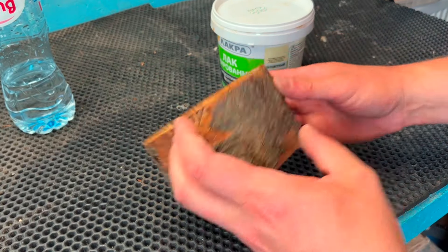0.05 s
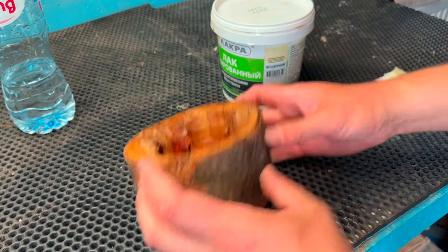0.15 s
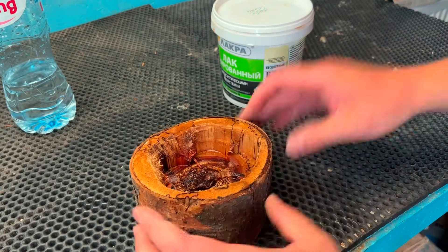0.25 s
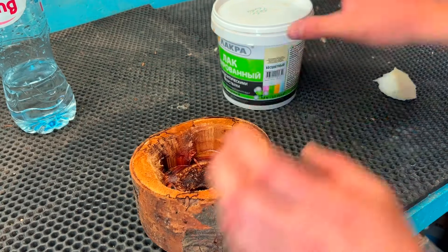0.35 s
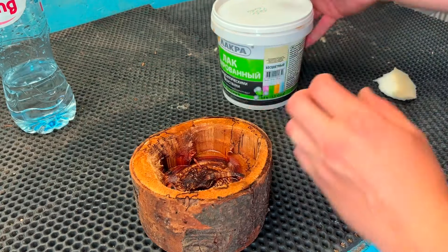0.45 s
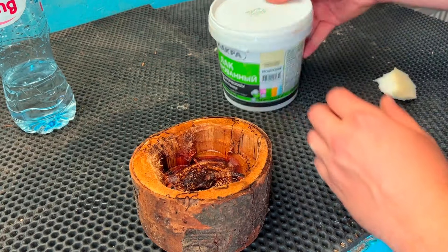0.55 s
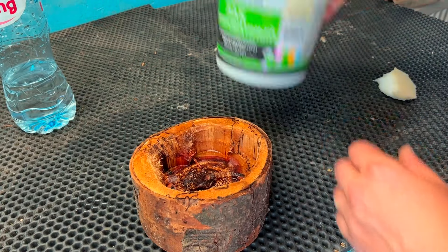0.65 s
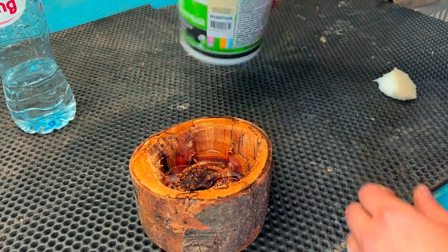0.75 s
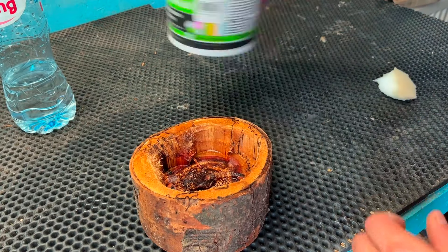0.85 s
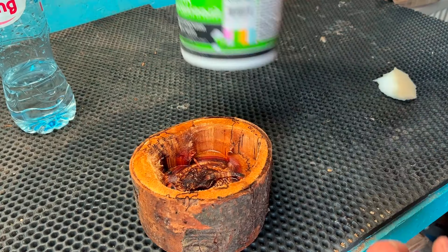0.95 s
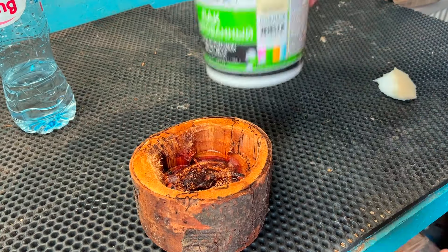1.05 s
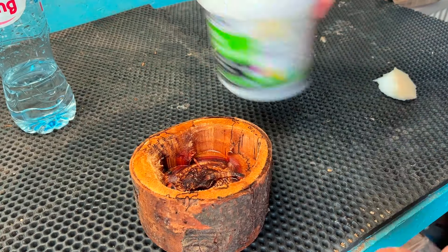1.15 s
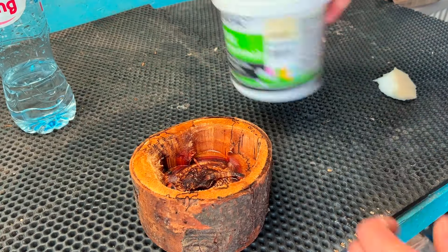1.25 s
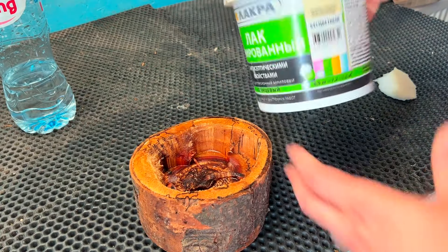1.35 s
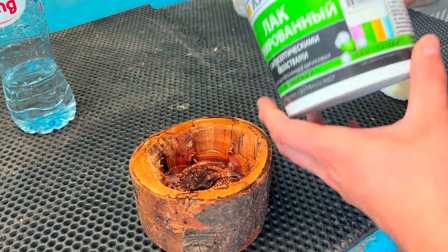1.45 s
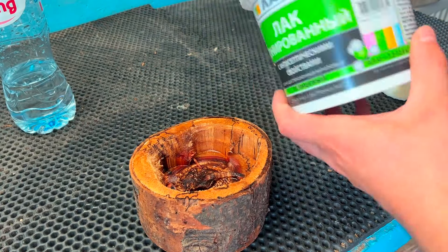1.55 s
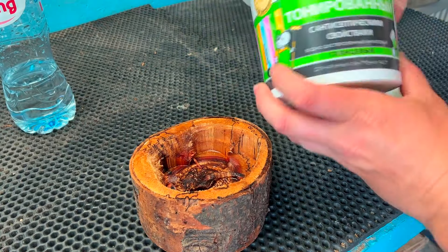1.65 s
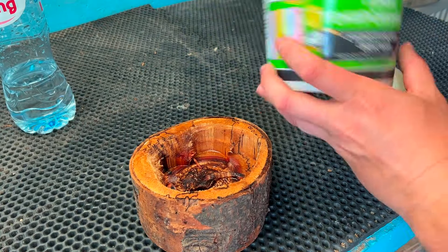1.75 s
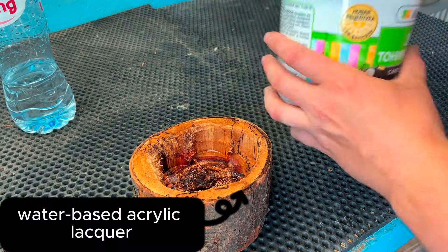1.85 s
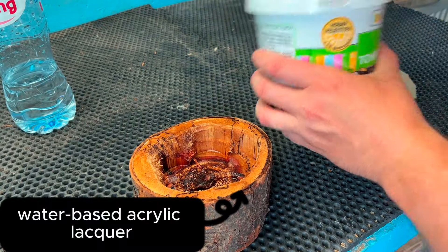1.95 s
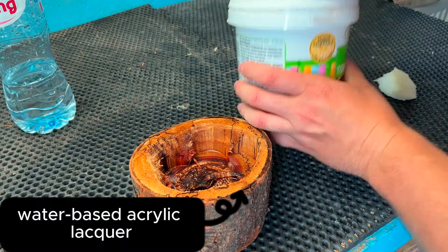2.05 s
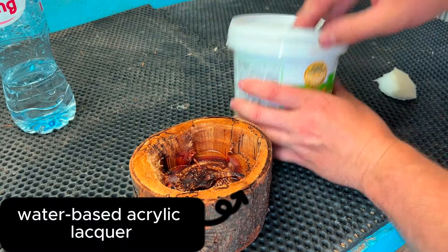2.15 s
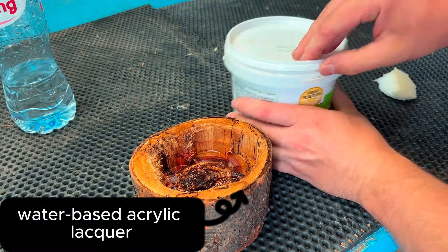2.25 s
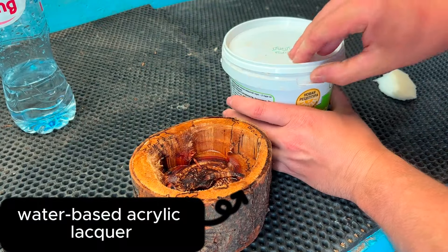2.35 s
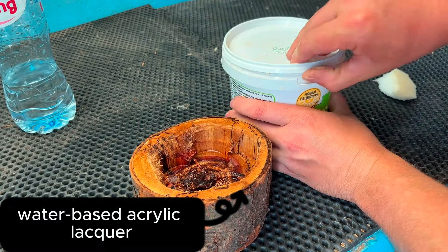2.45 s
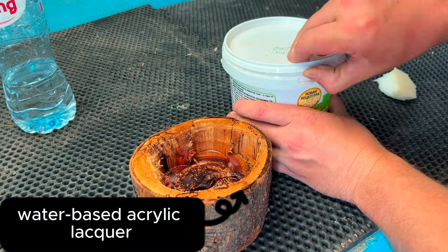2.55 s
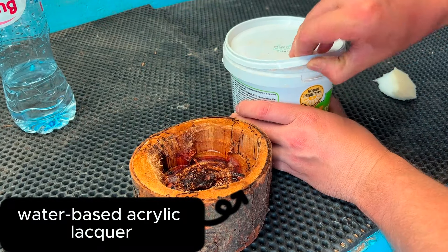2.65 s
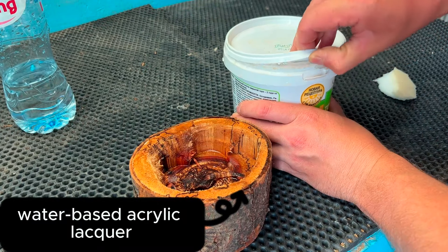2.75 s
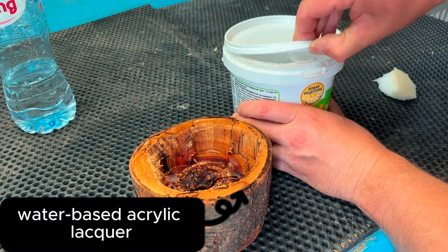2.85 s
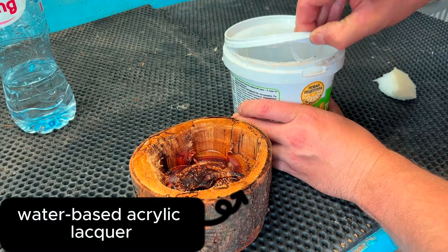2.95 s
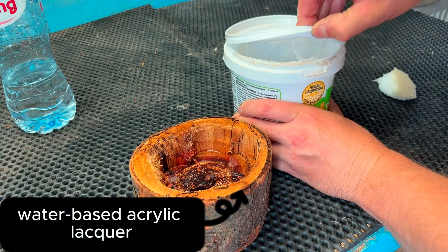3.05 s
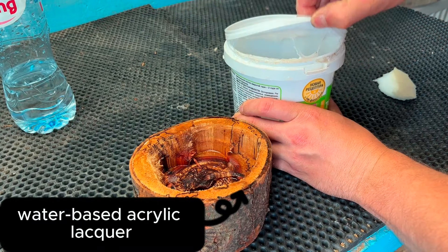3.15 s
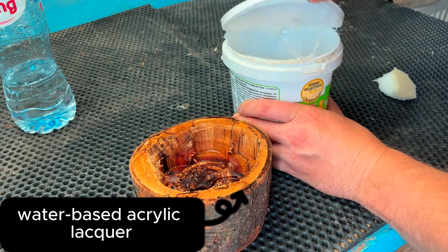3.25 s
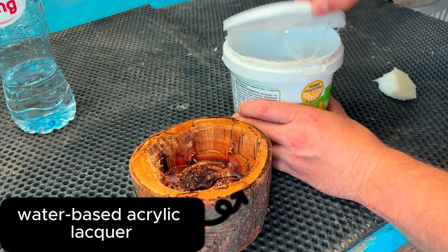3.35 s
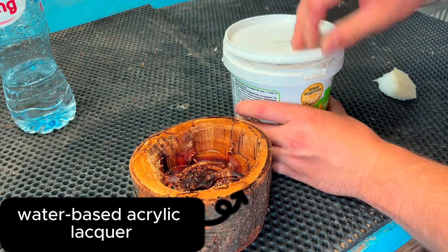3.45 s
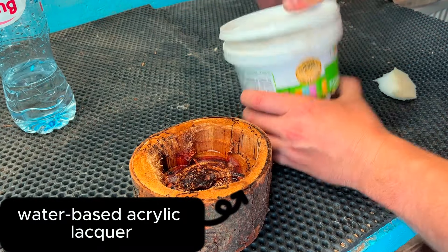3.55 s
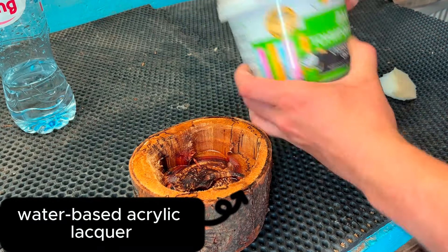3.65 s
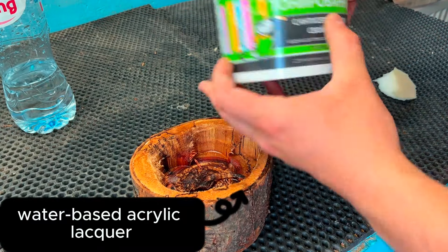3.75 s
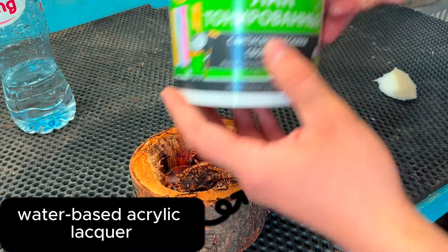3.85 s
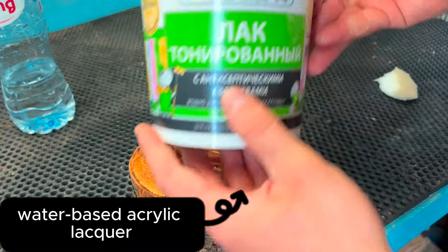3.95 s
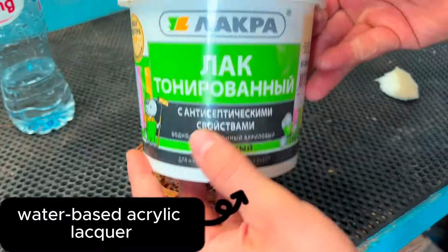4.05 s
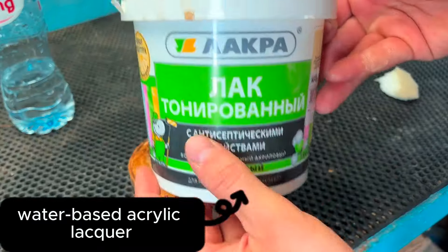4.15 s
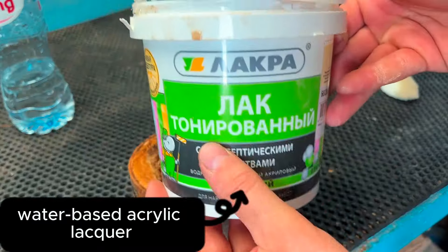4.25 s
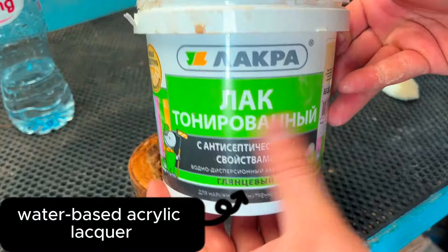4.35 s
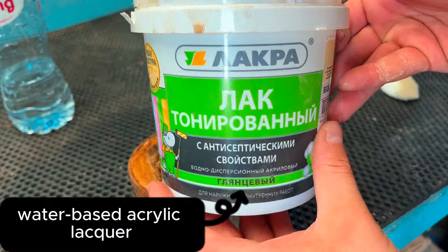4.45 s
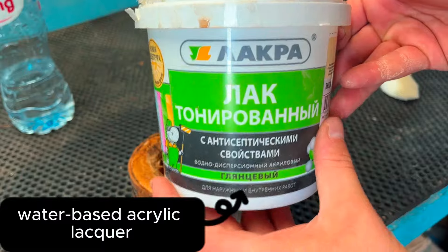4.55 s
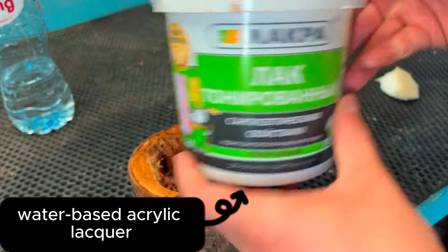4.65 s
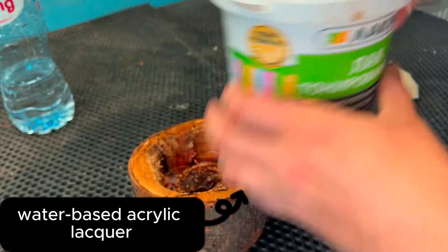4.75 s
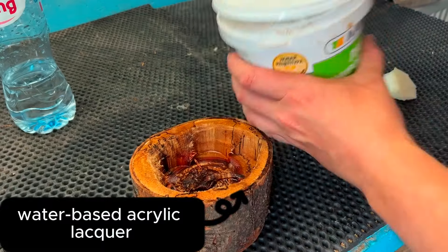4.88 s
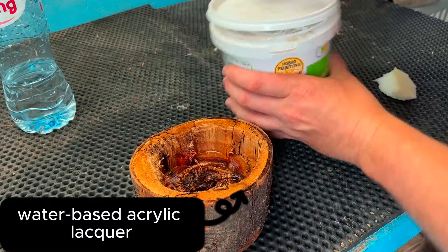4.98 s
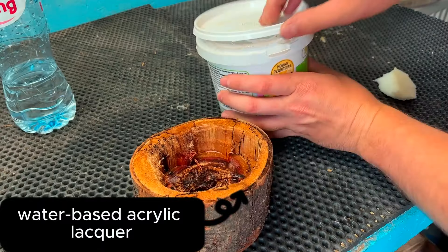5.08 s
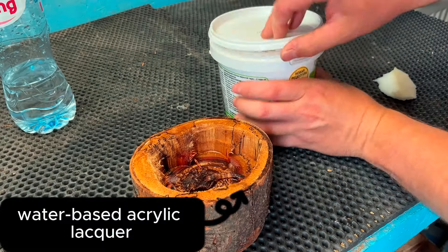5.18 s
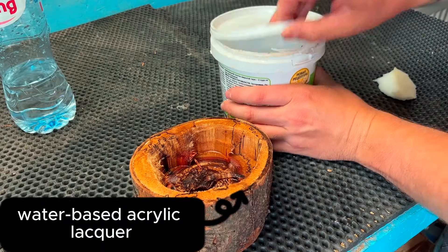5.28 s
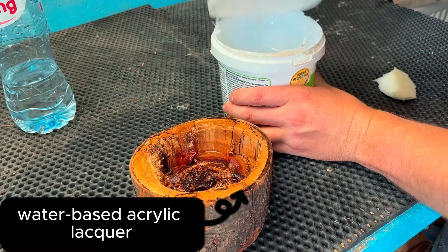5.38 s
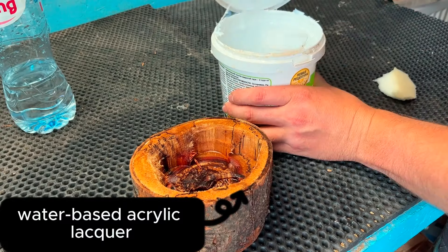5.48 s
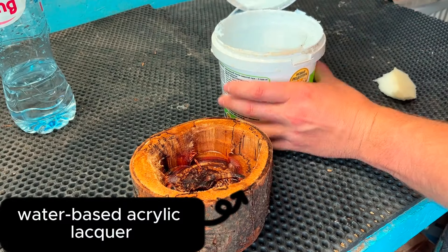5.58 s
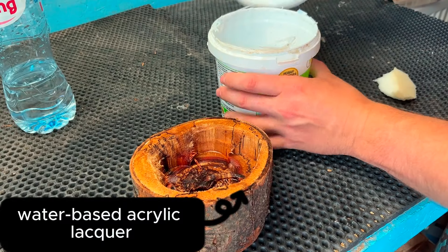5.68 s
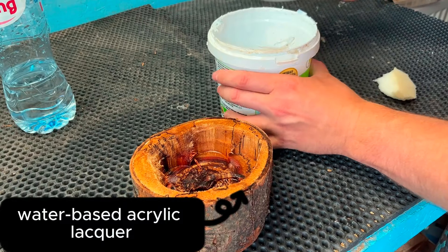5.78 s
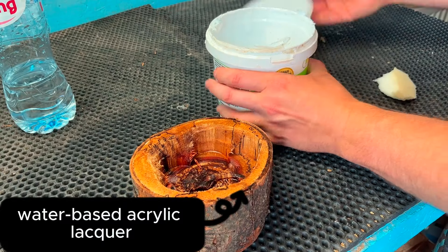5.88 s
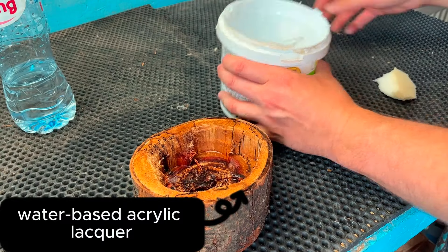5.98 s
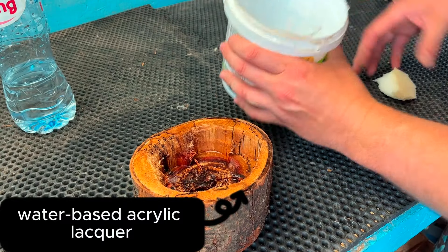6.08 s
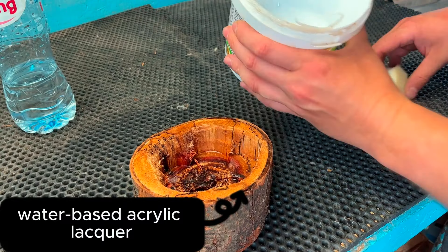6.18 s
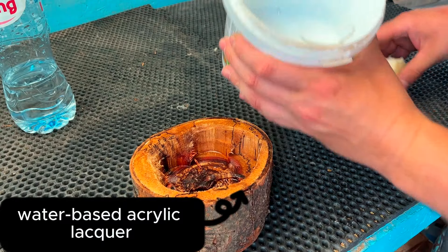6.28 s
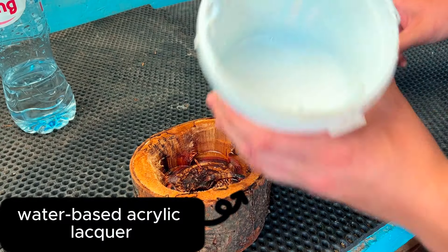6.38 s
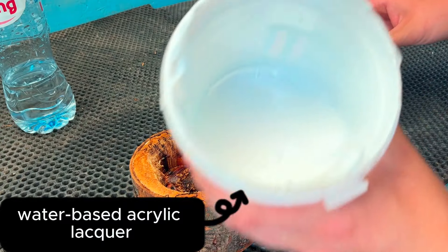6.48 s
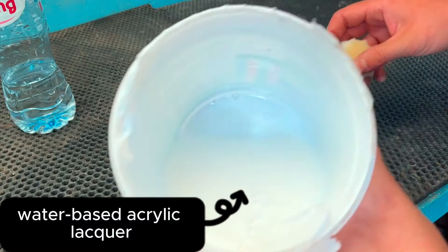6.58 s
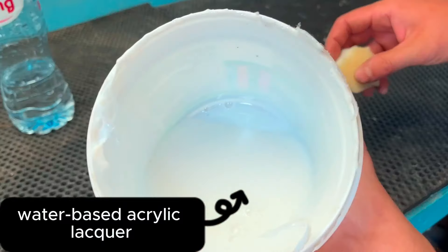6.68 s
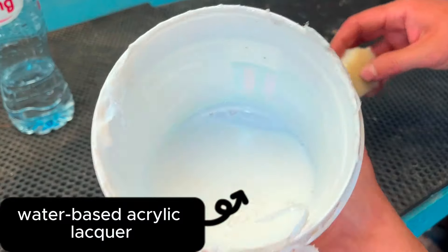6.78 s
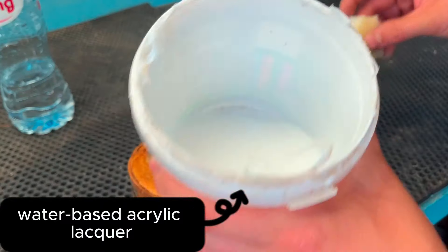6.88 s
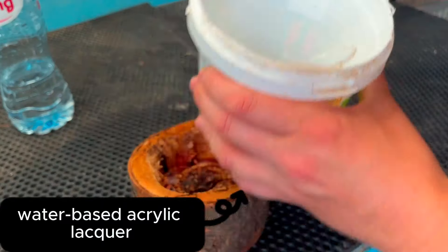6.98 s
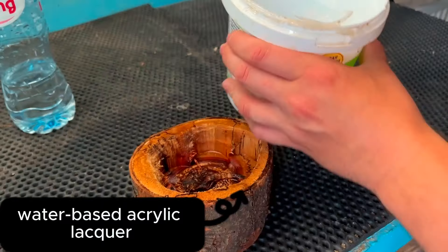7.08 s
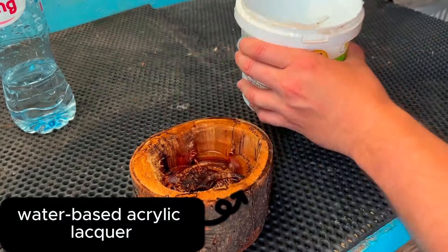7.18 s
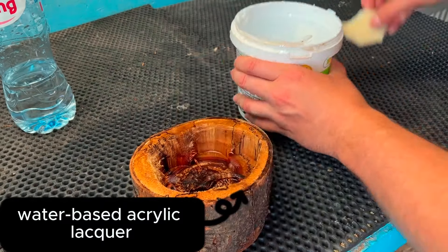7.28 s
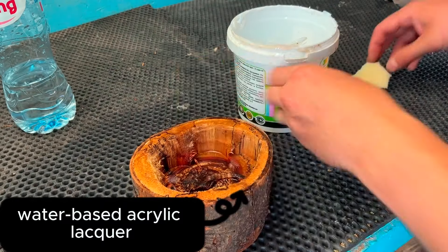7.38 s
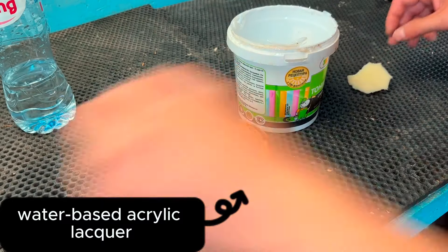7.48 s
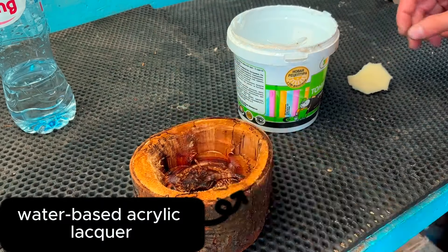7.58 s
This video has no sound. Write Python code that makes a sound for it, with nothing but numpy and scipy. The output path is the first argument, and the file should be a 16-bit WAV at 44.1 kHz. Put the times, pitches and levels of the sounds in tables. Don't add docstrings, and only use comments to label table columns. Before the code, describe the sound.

Hands shift a hollow plastic tub on a rubber mat, prying its lid off twice with sharp snaps, crackles, thuds and rubbing scrapes.

```python
import sys
import numpy as np
from scipy import signal
from scipy.fft import rfft, irfft, next_fast_len
from scipy.io import wavfile
from scipy.ndimage import uniform_filter1d

SR = 44100
rng = np.random.default_rng(int(sys.argv[2]) if len(sys.argv) > 2 else 0)


def magnitude_from_level(level_db):
    exponent = np.asarray(level_db, float) / 20
    return 10 ** exponent


def wav_out(sig):
    wavfile.write(sys.argv[1], SR, np.round(np.clip(np.atleast_2d(sig).T, -1, 1) * 32767).astype(np.int16))


N = 336042

# (frequency [Hz], density
# [dB per Hz])
HISS_SPECTRUM = [(1470, -22), (2500, -5.5), (4500, -4), (7400, -3), (8300, -14), (9300, -4), (12000, -4.5),
                 (14300, -9), (15100, -21), (16300, -40)]
# (frequency [Hz], width [Hz], level [dB])
WALL_MODES = [(1080, 400, -1), (1450, 450, -1), (2300, 1000, -3.5), (720, 200, -4)]


def evened(x):
    return x / np.sqrt(np.mean(x ** 2) + 1e-20)


def read(points, hz):
    f, value = np.transpose(points)
    return np.interp(np.log(hz + 1), np.log(f + 1), value)


def add(mix, s, sound):
    part = mix[..., round(s * SR):][..., :sound.shape[-1]]
    part += sound[..., :part.shape[-1]]


def peaks(modes, hz):
    return sum(magnitude_from_level(db) / (1 + (2 * (hz - f) / width) ** 2) for f, width, db in modes)


def coloured(x, gain):
    size = x.shape[-1]
    return evened(irfft(rfft(x) * gain(np.fft.rfftfreq(size, 1 / SR)), size))


def partly_same(left, other, same):
    same = np.clip(same, -1, 1)
    return np.array([left, same * left + np.sqrt(1 - same ** 2) * other])


def gritty(count, spread_db):
    slip_size = uniform_filter1d(np.minimum(rng.exponential(1, count), 5), size=12)
    left, other = rng.standard_normal((2, count))
    return partly_same(left, other, same=.68) * magnitude_from_level(spread_db * slip_size)


def ring(t, hz, t60, db, push):
    decay = magnitude_from_level(db - 60 * t / max(t60, .015))
    return decay * (1 - np.exp(-push * hz * t)) * np.sin(2 * np.pi * hz * t)


def air():
    # (frequency [Hz], density [dB per Hz])
    air_spectrum = [(12, -51.5), (20, -10), (60, -1.5), (142, -13), (168, -15.5), (270, -10.5), (698, -36),
                    (1660, -18.5), (2670, -42), (3160, -40), (4180, -41.5), (8400, -52), (16000, -54)]
    # (frequency [Hz], left-right likeness [-1..1])
    air_likeness = [(60, 1), (240, 1), (950, 0.26), (3770, 0.043), (15000, 0.4)]
    frames, hz = N // 256 + 5, np.fft.rfftfreq(1024, 1 / SR)
    a, b, c, d, patches = rng.standard_normal((frames, 513, 5)).T
    patches = evened(uniform_filter1d(uniform_filter1d(patches, 12, 0), 14, 1))
    z = partly_same(a + 1j * b, c + 1j * d, read(air_likeness, hz)[:, None])
    z *= magnitude_from_level(read(air_spectrum, hz)[:, None] + 1.2 * patches)
    return magnitude_from_level(-63.5) * evened(signal.istft(z, nperseg=1024, noverlap=768)[1][:, :N])


def touches(rows, rest_db):
    land_db_per_s, sag_db, let_go_db_per_s = 330, 10.5, 380
    t = np.arange(0, N + 64, 64) / SR
    s, length, db = np.transpose(rows)[:, :, None]
    since = t - s
    held_db = -sag_db * np.clip(since / length, 0, 1)
    held_db = held_db - let_go_db_per_s * np.maximum(since - length, 0)
    landing_db = land_db_per_s * np.minimum(since, 0)
    power = magnitude_from_level(2 * (db + held_db + landing_db)).sum(axis=0) + magnitude_from_level(2 * rest_db)
    return np.interp(np.arange(N) / SR, t, np.sqrt(power))


def rub():
    # (time [s], length [s], hiss level [dB], wall band re hiss [dB])
    strokes = [(.23, .08, -55, 0), (.59, .07, -52, -4), (.74, .11, -59, -2), (.85, .13, -55, 6),
               (.97, .1, -54, 6), (1.07, .13, -54, 5), (1.23, .06, -52, 8), (1.3, .11, -52, 8),
               (1.76, .17, -60, -4), (1.93, .13, -62, -2), (2.11, .12, -57, 2), (2.29, .23, -56, -5),
               (2.53, .11, -60, -13), (2.66, .22, -53, -7), (2.92, .24, -54, -9), (3.23, .11, -37, -4),
               (3.42, .2, -56, -2), (3.66, .14, -54, -7), (3.86, .4, -70, -3), (4.66, .14, -57, -8),
               (4.93, .46, -57.5, -6), (5.42, .17, -47, -1), (5.61, .18, -55, 0), (6.01, .09, -59, 8),
               (6.48, .34, -74, -5), (7.365, .11, -60, -1), (1.42, .07, -62, -3), (4.8, .1, -64, -6)]
    # (time [s], length [s], level [dB])
    grips = [(.25, .13, -47), (.57, .1, -49), (.76, .29, -48), (1.05, .2, -46), (1.22, .2, -44),
             (1.63, .07, -55), (1.8, .18, -55), (2.13, .2, -51), (2.53, .3, -58), (2.83, .24, -51),
             (3.23, .1, -40), (3.42, .2, -48), (3.63, .2, -49), (4.92, .08, -52), (5.1, .26, -47),
             (5.42, .17, -45), (5.6, .12, -58), (5.98, .13, -42), (7.38, .1, -48)]
    # (frequency [Hz], width [Hz], level [dB])
    hollow_modes = [(140, 70, -3), (300, 130, 0), (430, 100, -1)]
    grit = gritty(N, spread_db=11.0)
    stutter = coloured(rng.standard_normal(N), lambda hz: 1 / (1 + (hz / 30) ** 2))
    hiss_gain = touches([row[:3] for row in strokes], rest_db=-95)
    wall_gain = touches([(s, length, db + wall_db) for s, length, db, wall_db in strokes], rest_db=-81)
    hollow_gain = touches(grips, rest_db=-73)
    bright = hiss_gain * coloured(grit, lambda hz: magnitude_from_level(read(HISS_SPECTRUM, hz)))
    bright += magnitude_from_level(2.5) * wall_gain * coloured(grit, lambda hz: peaks(WALL_MODES, hz))
    _, _, z = signal.stft(bright, nperseg=256)
    patches = evened(uniform_filter1d(rng.standard_normal(z.shape[:0:-1]).T, size=9, axis=1))
    patches = evened(uniform_filter1d(patches, size=4, axis=0))
    bright = signal.istft(z * magnitude_from_level(3.8 * patches - 1.8), nperseg=256)[1][:, :N]
    hollow = hollow_gain * coloured(grit[0], lambda hz: peaks(hollow_modes, hz))
    return magnitude_from_level(2.6 * stutter - 3.6) * (bright + hollow)


def releases():
    # (time [s], rms level [dB], wall band re level [dB], 10 dB fall [s])
    cracks = [(.29, -47, -10, .005), (.666, -46, -25, .002), (.726, -41, -17, .005), (1.058, -49, -5, .006),
              (1.178, -41, -13, .004), (2.234, -42, -9, .008), (2.609, -55, -25, .005),
              (2.755, -37, -13, .004), (2.763, -36, -14, .003), (2.895, -51, -1, .008),
              (2.963, -42, -9, .018), (3.049, -38, -15, .006), (3.067, -41, -10, .007),
              (3.195, -34, -11, .015), (3.222, -22, -4, .007), (3.238, -24, -6, .04),
              (3.303, -24, -15, .006), (3.313, -28, -15, .006), (3.323, -28, -18, .007),
              (3.401, -49, -4, .011), (3.45, -42, 1, .008), (3.526, -42, -2, .007), (5.408, -38, -2, .018),
              (5.426, -35, -1, .005), (5.438, -30, -7, .011), (5.453, -36, -6, .013),
              (5.485, -27, -8, .009), (5.738, -37, -3, .006), (5.969, -44, 7, .011)]
    # (time [s], rms level [dB], wall re level [dB], 10 dB fall [s], top re level [dB])
    rattles = [(.569, -39, -5, .004, -14), (.584, -44, -3, .008, -15), (.888, -36, -2, .009, -25),
               (.987, -38, -3, .007, -20), (1.036, -53, -2, .017, -17), (1.1, -47, 0, .02, -17),
               (1.129, -37, -2, .008, -11), (1.223, -36, -1, .008, -19), (1.262, -34, 3, .006, -9),
               (1.27, -45, 4, .01, -13), (1.961, -48, -7, .02, -10), (2.317, -31, -16, .0028, -12),
               (3.623, -57, 4, .018, -10), (3.657, -48, -5, .023, -11), (4.934, -53, -6, .05, -12),
               (4.978, -40, -12, .005, -13), (5.883, -61, -3, .023, -16), (6.021, -41, 8, .009, -20),
               (6.222, -48, -11, .012, -9)]
    # (time [s], rms level [dB], wall re level [dB], 10 dB fall [s], 10 dB rise [s])
    peels = [(.233, -46, -6, .021, .016), (.497, -51, -5, .022, .008), (.753, -44, -9, .019, .018),
             (.934, -43, -9, .011, .008), (1.422, -42, -11, .01, .009), (1.651, -42, -10, .013, .016),
             (2.54, -37, -20, .018, .012), (2.677, -30.5, -11, .011, .013), (2.854, -55, -1, .01, .033),
             (2.931, -33, -11, .013, .014), (2.986, -46, -13, .019, .009), (3.126, -50, -15, .015, .017),
             (4.775, -57, -6, .023, .08), (5.541, -45, 2.5, .01, .014), (5.606, -50, 2, .008, .009),
             (5.638, -44, 1, .026, .019), (6.007, -48, 8, .01, .005), (7.365, -54, 5, .01, .005)]
    # (time [s], rms level [dB], 10 dB fall [s])
    brushes = [(.139, -66, .032), (.703, -53, .012), (.861, -50, .026), (1.296, -47, .018),
               (1.72, -53, .031), (2.051, -55, .025), (2.175, -54, .014), (4.134, -66, .04),
               (4.424, -53, .028), (4.882, -58, .025), (5.123, -56, .035), (5.275, -54, .03),
               (6.909, -68, .025), (7.071, -64, .03), (7.449, -59, .015), (2.222, -51, .012),
               (2.248, -48, .012), (2.304, -47, .012), (2.518, -52, .008), (3.18, -50, .008)]
    return ([(s, db, wall, -2.2, fall, .0026) for s, db, wall, fall in cracks]
            + [(s, db, wall, top, fall, .45 * fall) for s, db, wall, fall, top in rattles]
            + [(s, db, wall, -2.2, fall, rise) for s, db, wall, fall, rise in peels]
            + [(s, db, -7, -4.5, fall, .85 * fall) for s, db, fall in brushes])


def snaps():
    edge_hz_per_db, split_hz = 220, 8500
    out, t, hz = np.zeros((2, N)), np.arange(-3072, 5120) / SR, np.fft.rfftfreq(8192, 1 / SR)
    hiss, wall = magnitude_from_level(read(HISS_SPECTRUM, hz)), evened(peaks(WALL_MODES, hz))
    for s, db, wall_db, top_db, fall, rise in releases():
        spots = [(3000 + 10000 * place, 400, 14.0 * height - 8) for place, height in rng.random(size=(4, 2))]
        edge_hz = edge_hz_per_db * max(-wall_db, 1)
        rim = hiss * (1 + peaks(spots, hz)) * hz ** 2 / (hz ** 2 + edge_hz ** 2)
        top_share = np.clip(magnitude_from_level(top_db), 0, .97)
        colour = np.sqrt(1 - top_share ** 2) * evened(rim * (hz < split_hz))
        colour += top_share * evened(rim * (hz >= split_hz))
        colour += magnitude_from_level(wall_db - .4) * wall
        grit = irfft(rfft(evened(gritty(len(t), spread_db=12.0))) * colour)
        rise_db = (abs(t) / max(rise - .0012, 3e-4)) ** 1.3
        fall_db = abs(t) / max(fall - .002, 1e-3)
        swell_db = -10 * np.where(t < 0, rise_db, fall_db)
        swell_db += 4.0 * np.exp(-abs(t) / 7e-4 - rise / .006)
        swell = magnitude_from_level(swell_db)
        add(out, s + t[0], magnitude_from_level(db - .3) * np.sqrt(np.mean(swell ** 2)) * evened(swell * grit))
    return out


def knocks():
    # (time [s], tub peak [dB], tub ring [Hz], mat thud [dB], bench thud [dB])
    thuds = [(.214, -39.5, 368, -34, -31), (.232, -29.5, 335, -29, -22), (.259, -39, 273, -34, -28),
             (.281, -33, 257, -25, -27), (.568, -33, 340, -40, -42), (1.772, -25, 271, -38.5, -62),
             (2.111, -31, 298, -29, -59), (2.122, -22, 290, -30, -56), (2.216, -36, 314, -33, -39),
             (2.233, -34.5, 200, -37, -38), (3.229, -40, 472, -34, -60), (3.623, -31, 405, -37, -47),
             (3.659, -36, 405, -40, -57), (3.76, -34.5, 346, -24.5, -30), (3.779, -27.5, 198, -31, -31),
             (5.105, -38.5, 385, -47, -46), (5.174, -28.5, 312, -19, -32), (5.403, -42, 493, -38, -41),
             (5.437, -40, 480, -31, -49), (5.481, -32.5, 327, -41, -50), (5.737, -48, 461, -32, -59),
             (5.969, -26, 260, -26, -50), (6.004, -30, 390, -36, -40), (7.364, -28, 276, -22, -35)]
    # (time [s], tub peak [dB], tub ring [Hz])
    flexes = [(.752, -43.5, 398), (.859, -29.5, 375), (.887, -32, 380), (.979, -38.5, 385),
              (1.13, -33, 231), (1.217, -28, 256), (1.264, -33.5, 390), (1.339, -36, 259),
              (1.957, -42.5, 231), (2.676, -31, 271), (2.845, -41, 289), (2.899, -34, 335),
              (2.924, -30.5, 366), (2.966, -26.5, 356), (2.988, -38.5, 357), (3.05, -32, 393),
              (3.197, -29, 458), (3.24, -38, 480), (3.247, -24, 270), (3.264, -33, 470), (3.307, -31, 325),
              (3.33, -42, 340), (5.453, -33, 600), (5.459, -34, 350), (3.448, -41, 500),
              (3.491, -36.5, 326), (3.526, -35, 360), (4.763, -47.5, 390)]
    tub_t60, mat_hz, mat_t60, bench_hz, bench_t60 = .06, 137, .12, 56, .19
    held_mat_db, held_bench_db = -23, -33
    held = [(s, db, hz, db + held_mat_db, db + held_bench_db) for s, db, hz in flexes]
    out, t = np.zeros(N), np.arange(SR // 4) / SR
    for s, db, hz, mat_db, bench_db in thuds + held:
        under, over, mat, bench = rng.uniform(-1.1, 1, size=4)
        tub = ring(t, hz, tub_t60, db + 3.5, push=.85)
        tub += ring(t, hz * (.7 + .08 * under), .7 * tub_t60, db - 3.5, push=.8)
        tub += ring(t, hz * (1.3 + .1 * over), .6 * tub_t60, db - 8, push=1.2)
        tub += ring(t, hz * (2.1 + .3 * under), .4 * tub_t60, db - 16, push=2.5)
        pad = ring(t, mat_hz * (1 + .081 * mat), mat_t60, mat_db + 1.5, push=.6)
        pad += ring(t, 1.35 * mat_hz, .7 * mat_t60, mat_db - 7, push=.9)
        table = ring(t, bench_hz * (1 + .11 * bench), bench_t60, bench_db + 1.5, push=1.6)
        table += ring(t, 1.6 * bench_hz, .7 * bench_t60, bench_db - 4, push=1.4)
        add(out, s, tub + pad + table)
    return out


def taps(rows):
    out, t = np.zeros(N), np.arange(SR // 10) / SR
    for s, db, hz, t60 in rows:
        cluster = hz * (1 + .14 * np.array([-1, 1, 2]) + .05 * rng.uniform(-1, 1, size=3))
        neighbours = sum(ring(t, f, .7 * t60, db - 11, push=2.5) for f in cluster)
        add(out, s, ring(t, hz, t60, db - .8, push=.85) + neighbours)
    return out


def pops():
    # (time [s], peak [dB], frequency [Hz], t60 [s])
    pop_rows = [(.568, -38, 3500, .025), (.579, -29, 330, .05), (.583, -40, 2600, .025),
                (2.118, -44, 1150, .04), (2.229, -20, 150, .07), (2.138, -26, 150, .09),
                (2.316, -33, 7000, .015), (2.634, -44, 11000, .012), (2.668, -24, 10500, .012),
                (2.681, -27, 5500, .012), (5.63, -44, 4800, .05), (7.373, -26, 200, .08),
                (5.604, -44, 2000, .04), (3.525, -40, 1300, .025), (6.022, -30, 150, .12),
                (2.318, -45, 900, .03), (2.535, -40, 290, .09), (2.66, -45, 650, .04),
                (2.68, -36, 950, .03), (2.855, -34, 290, .07), (3.02, -40, 370, .04), (3.07, -40, 390, .04),
                (3.224, -15, 340, .045), (3.2245, -9, 485, .052), (3.197, -36, 340, .04),
                (3.25, -19, 465, .07), (3.771, -25, 170, .08), (5.095, -39, 385, .06),
                (5.166, -40, 600, .05), (5.168, -44, 1500, .04), (5.268, -44, 370, .2),
                (5.627, -43, 700, .08), (5.736, -37, 1950, .03), (6.062, -43, 1350, .15),
                (7.364, -44, 2050, .04), (7.446, -38, 170, .08), (5.41, -18, 510, .04),
                (5.425, -20, 530, .035), (5.436, -16, 480, .035), (5.9735, -14, 134, .11),
                (5.177, -24, 148, .07), (7.383, -31, 180, .12), (3.23, -24, 150, .09),
                (7.447, -52, 2300, .03), (5.604, -46, 1100, .03), (5.495, -36, 2000, .04),
                (5.635, -42, 2000, .05)]
    return taps(pop_rows)


def panel_rings():
    # (time [s], peak [dB], frequency [Hz], t60 [s])
    panel_rows = [(.888, -32, 735, .06), (.887, -33, 3150, .03), (.894, -35, 1950, .035),
                  (1.057, -44, 3150, .03), (1.08, -43, 3050, .03), (1.099, -43, 2950, .03),
                  (1.1, -42, 750, .04), (1.122, -36, 1950, .05), (1.13, -37, 1100, .04),
                  (1.221, -35, 1020, .05), (1.22, -36, 3400, .03), (1.243, -38, 2050, .04),
                  (1.265, -21, 1080, .04), (1.268, -25, 1800, .03), (1.333, -38, 800, .04),
                  (1.347, -36, 1520, .04), (1.406, -38, 1170, .05), (2.121, -38, 721, .04),
                  (3.236, -30, 700, .05), (3.252, -29, 700, .06), (3.446, -46, 700, .07),
                  (5.425, -36, 1400, .04), (5.481, -31, 694, .09), (5.481, -35, 2050, .06),
                  (5.534, -41, 1990, .06), (5.625, -41, 2020, .07), (5.967, -30, 1250, .03),
                  (5.967, -31, 650, .06), (6.004, -26, 1300, .04), (6.006, -33, 800, .06),
                  (6.02, -24, 1290, .05), (6.02, -21, 1420, .022), (6.02, -26, 2350, .02),
                  (6.02, -30, 750, .07), (6.054, -35, 1380, .06), (7.362, -33, 800, .028)]
    return taps(panel_rows)


def glides(rows):
    width_share, steady = .09, 1.6
    out = np.zeros(N)
    for s, length, db, from_hz, to_hz in rows:
        u = np.linspace(0, 1, 1 + int(length * SR))
        r = np.exp(-np.pi * width_share * from_hz / SR)
        noise = rng.standard_normal((2, 4096 * (2 + len(u) // 4096)))
        a, b = signal.lfilter([1], [1, -2 * r, r * r], noise)[:, -len(u):]
        turn = np.exp(2j * np.pi * np.cumsum(from_hz + (to_hz - from_hz) * u) / SR)
        tone = (turn * (steady + evened(a) + 1j * evened(b))).real
        swell = np.sqrt(np.abs(np.sin(np.pi * u ** .6)))
        add(out, s, magnitude_from_level(db) * evened(tone * swell))
    return out


def creaks():
    # (time [s], length [s], rms level [dB], from [Hz], to [Hz])
    creak_rows = [(1.32, .04, -56, 2500, 2700), (1.36, .04, -55, 2200, 2400), (1.35, .07, -54, 1650, 1150),
                  (2.83, .04, -54, 300, 305), (2.91, .04, -43, 350, 370), (2.985, .03, -42, 365, 375),
                  (3.265, .03, -46, 480, 500), (3.292, .035, -42, 540, 550), (3.328, .03, -56, 560, 570),
                  (3.46, .045, -49, 430, 320), (3.53, .04, -49, 360, 410), (3.635, .06, -49, 400, 405),
                  (3.705, .045, -55, 395, 400), (5.45, .02, -40, 560, 600), (5.47, .04, -49, 680, 720)]
    return glides(creak_rows)


def far_machine():
    # (time [s], length [s], rms level [dB], from [Hz], to [Hz])
    whine = (4.2, .55, -75, 1550, 1570)
    return magnitude_from_level(9.5) * glides([whine])


def swipe():
    # (time [s], level [dB])
    swipe_curve = [
        (6.19, -66),
        (6.22, -50),
        (6.28, -45),
        (6.38, -58),
        (6.44, -74),
    ]
    # (frequency [Hz], density [dB per Hz])
    swipe_spectrum = [(600, -30), (1000, -8), (4000, 0), (8000, -8), (13000, -15), (16000, -30)]
    s, db = np.transpose(swipe_curve)
    gain = magnitude_from_level(np.interp(np.arange(N) / SR, s, db, -200, -200))
    friction = coloured(gritty(N, spread_db=4.0), lambda hz: magnitude_from_level(read(swipe_spectrum, hz)))
    return magnitude_from_level([[.4], [-3.5]]) * gain * friction


def room(x):
    # (frequency [Hz], t60 [s])
    room_t60 = [(200, .16), (3000, .1), (12000, .06)]
    echoes = np.zeros((2, SR // 2))
    at = np.arange(80, SR // 2 - 20, 20) + rng.integers(0, 20, (2, (SR // 2 - 81) // 20))
    np.put_along_axis(echoes, at, rng.choice([-1., 1.], at.shape), 1)
    hz, t, z = signal.stft(echoes, SR, nperseg=256)
    decay = magnitude_from_level(-60 * t / read(room_t60, hz)[:, None])
    tail = signal.istft(z * decay, SR, nperseg=256)[1]
    return signal.fftconvolve(x[None], tail / np.linalg.norm(tail[0]), axes=1)[:, :N]


def ports(x):
    # (frequency [Hz], lead of left port [rad])
    left_lead = [(20, 0), (430, -.3), (750, 1.5), (1400, 1.4), (1890, .3), (3010, .8), (6550, -1),
                 (7750, -2.9), (9300, -3.7), (11200, -6.1), (16000, -9.4)]
    # (frequency [Hz], left re right [dB])
    left_louder = [(60, 2.5), (200, 1), (380, -2.5), (650, 2), (1290, -1), (2400, 1), (8000, 0)]
    size = next_fast_len(N)
    hz = np.fft.rfftfreq(size, 1 / SR)
    half = np.exp(.5j * read(left_lead, hz)) * magnitude_from_level(.5 * read(left_louder, hz))
    return irfft(rfft(x, size) * np.array([half, 1 / half]), size)[:, :N]


def scene():
    near = rub() + snaps() + knocks() + pops() + panel_rings() + creaks() + swipe()
    thin = signal.lfilter(*signal.butter(1, 160, "high", fs=SR), near.mean(0))
    return ports(near) + magnitude_from_level(-9.5) * room(thin + far_machine()) + air()


def roll_off(x):
    return signal.sosfilt(signal.butter(12, 16400, fs=SR, output="sos"), x)


def record(dry):
    return roll_off(dry)


dry = scene()
out = record(dry)
wav_out(out)
```